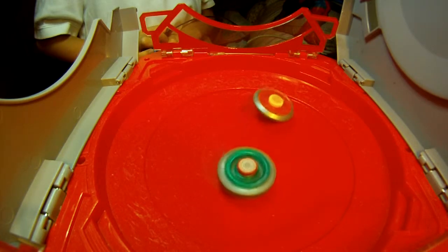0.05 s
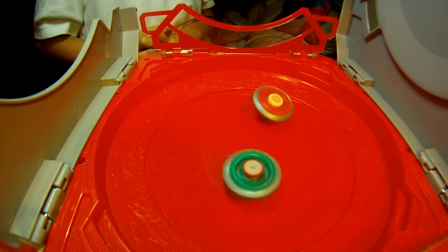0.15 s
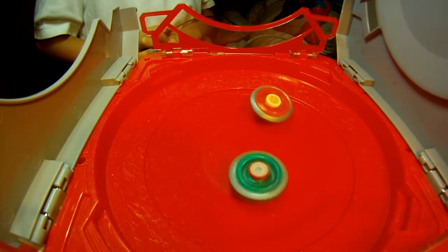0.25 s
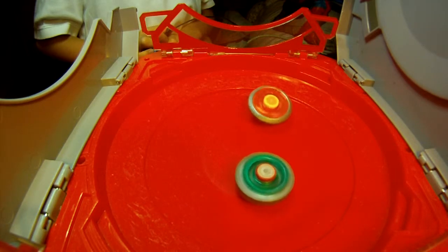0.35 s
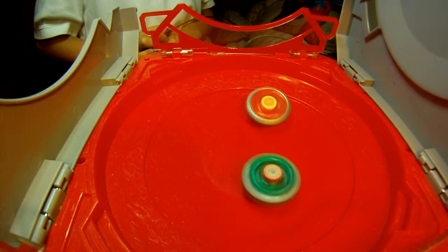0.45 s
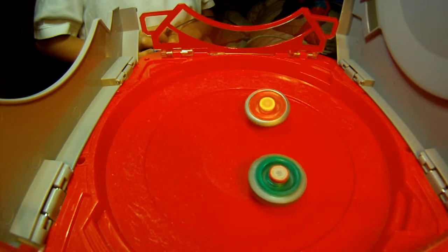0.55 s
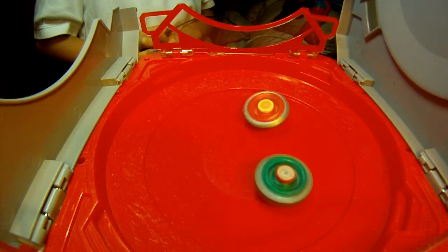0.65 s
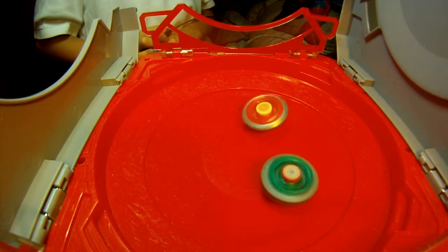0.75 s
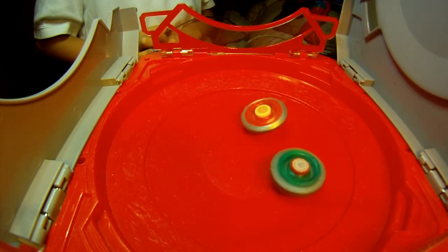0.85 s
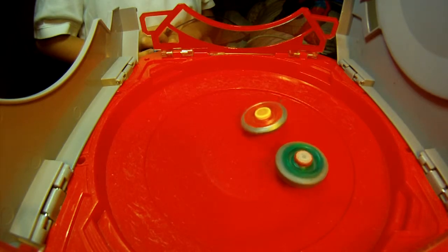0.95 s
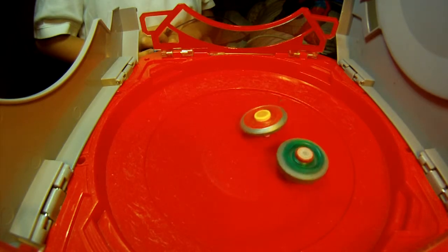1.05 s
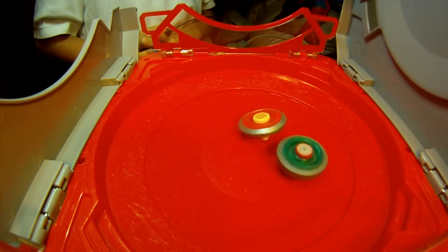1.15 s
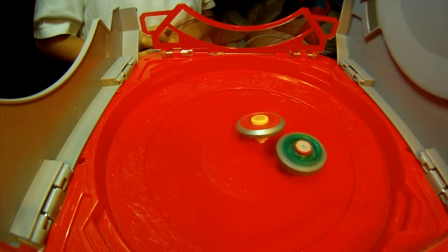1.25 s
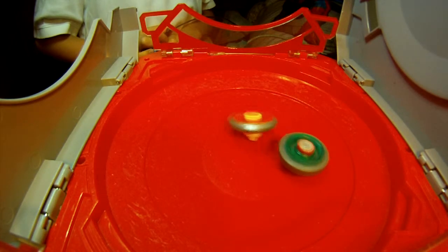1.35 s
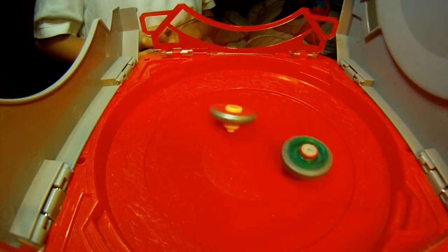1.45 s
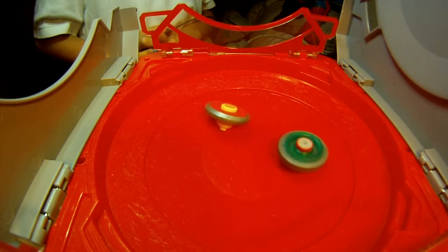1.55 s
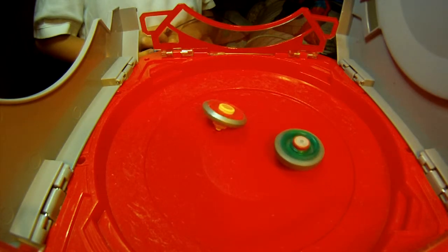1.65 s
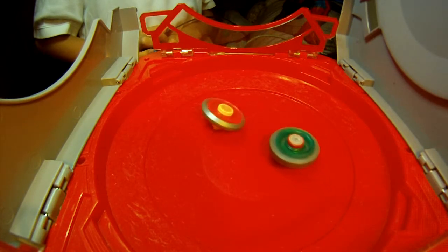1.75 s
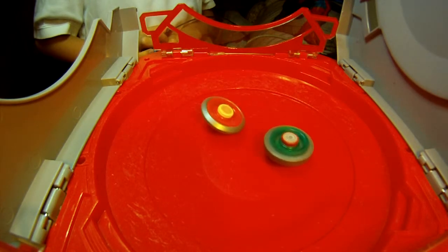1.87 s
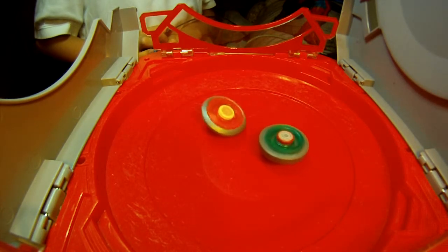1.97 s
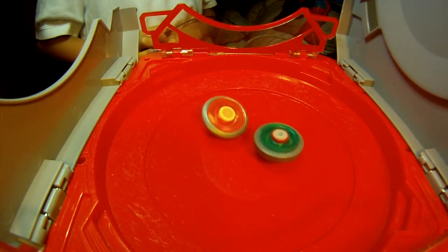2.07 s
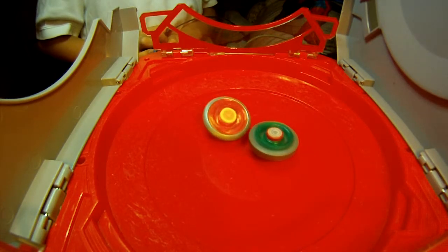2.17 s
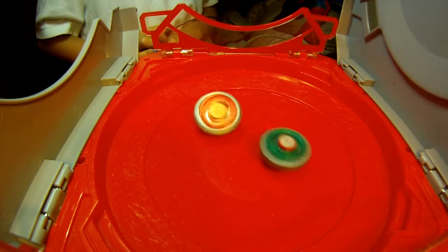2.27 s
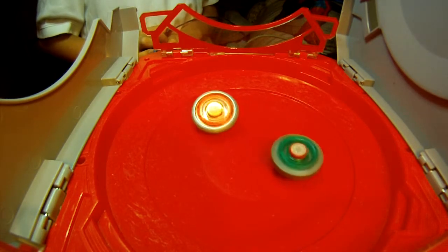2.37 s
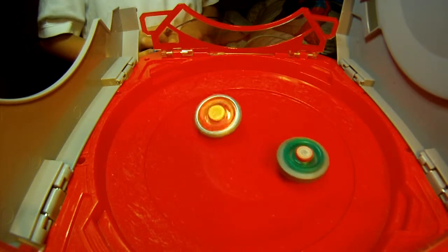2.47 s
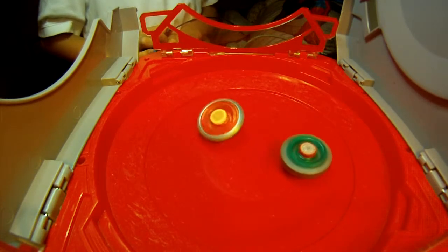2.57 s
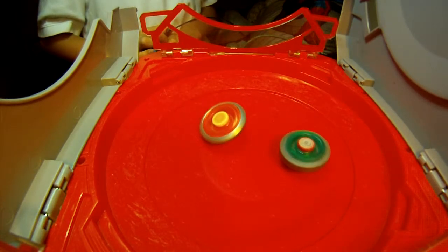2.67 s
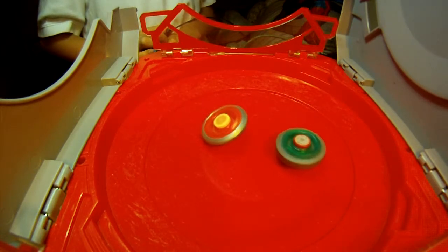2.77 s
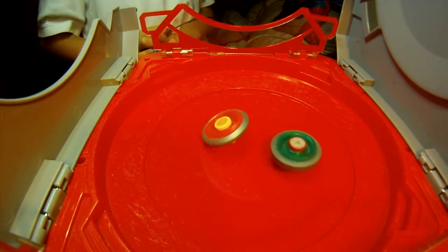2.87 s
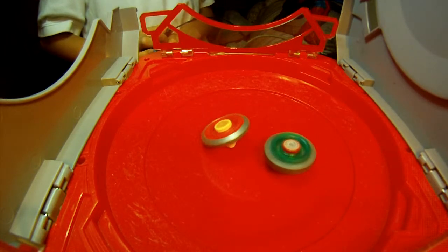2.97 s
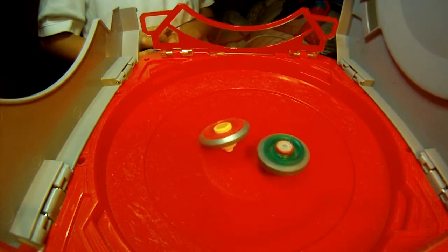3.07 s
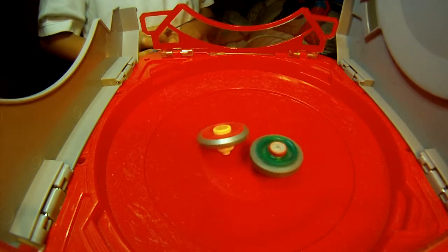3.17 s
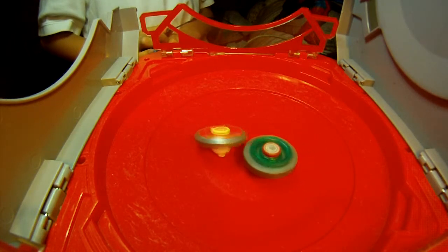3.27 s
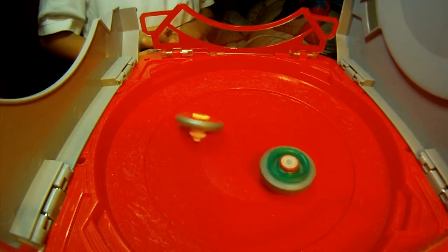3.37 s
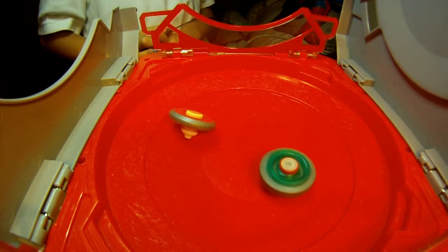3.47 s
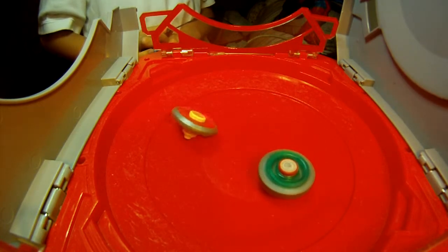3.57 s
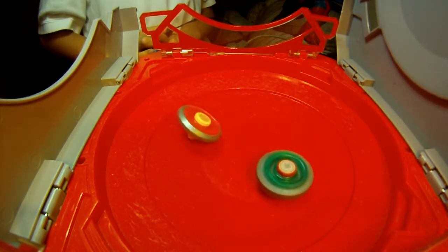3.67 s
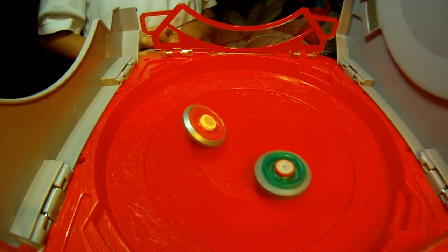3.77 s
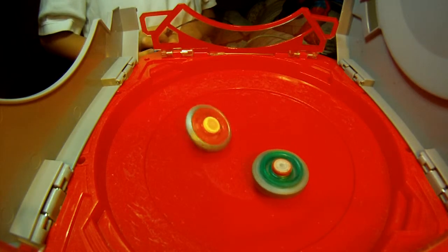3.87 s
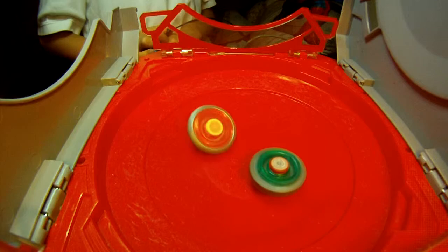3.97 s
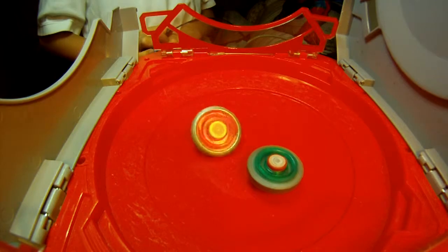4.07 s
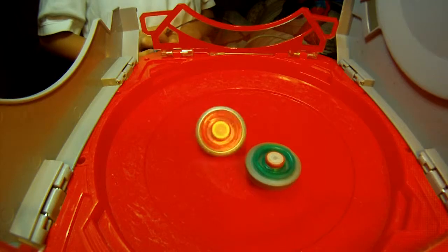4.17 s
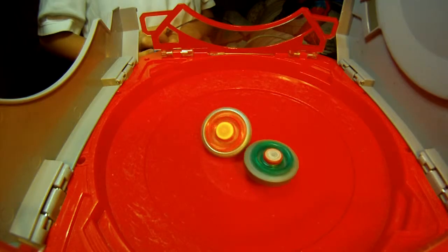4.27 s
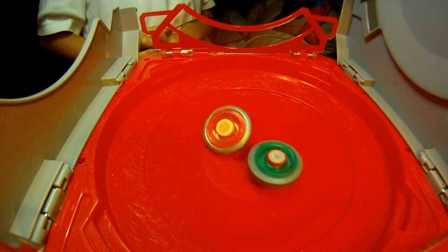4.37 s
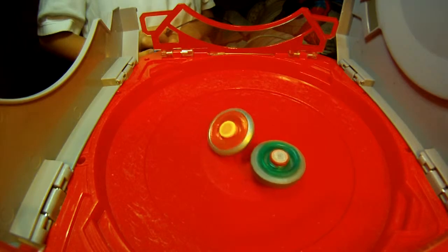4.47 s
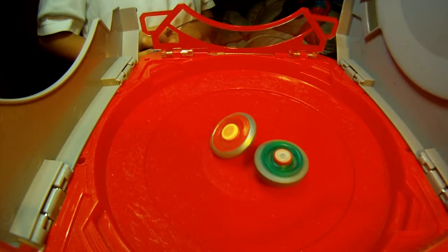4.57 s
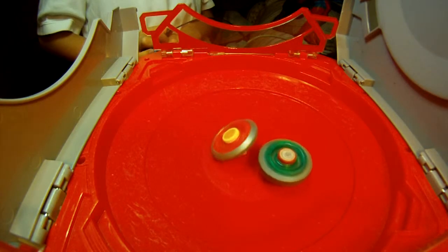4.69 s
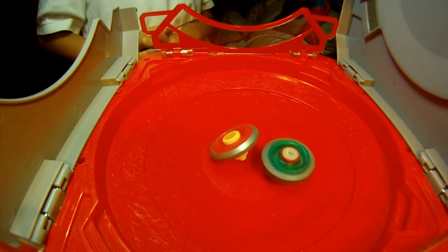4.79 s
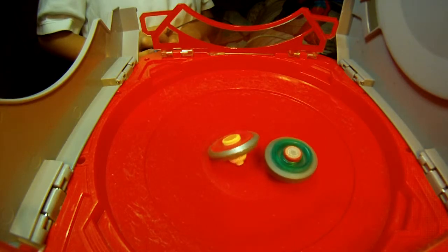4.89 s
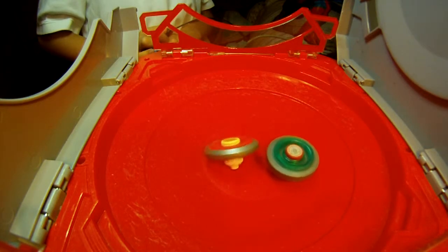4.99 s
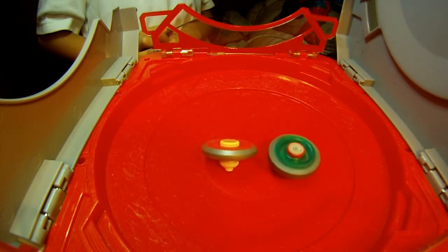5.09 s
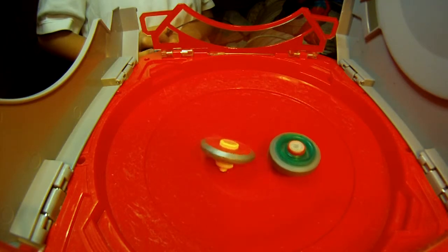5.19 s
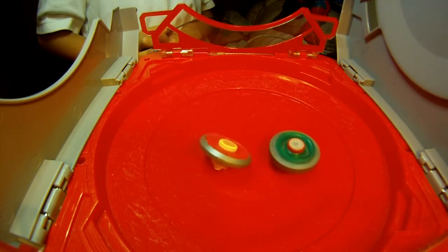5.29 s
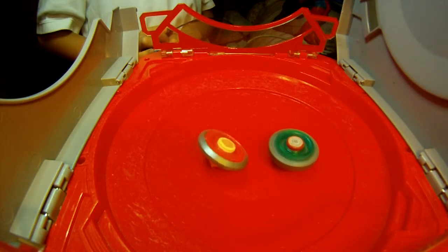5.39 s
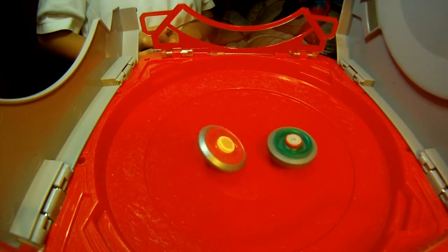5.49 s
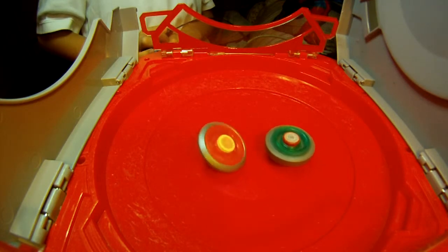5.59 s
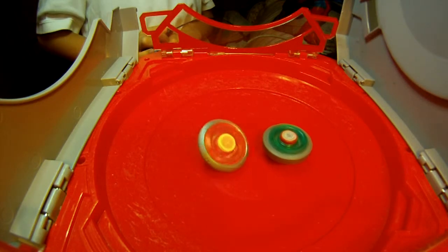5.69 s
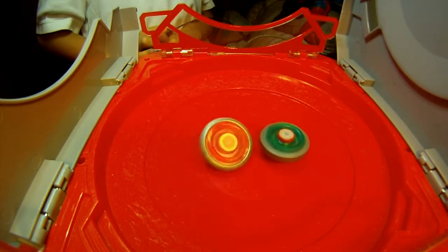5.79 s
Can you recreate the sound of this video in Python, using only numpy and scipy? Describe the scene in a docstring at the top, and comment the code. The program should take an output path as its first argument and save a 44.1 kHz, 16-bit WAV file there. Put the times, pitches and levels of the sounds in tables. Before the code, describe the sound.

In a quiet small room with soft low air noise, two metal-wheeled tops spin on a thin plastic toy floor. A clash at the very start sets off a tenth of a second of hollow, drumming bounces. Then a quiet whir: a low drone slowly fading, rough hiss, a faint early squeak, and a hum swooping up and down about thirty times a second. A tiny tick comes at 0.8. Hard metallic cracks with short bright rings strike at 1.4, 2.3, 3.35 and 4.4 seconds, each followed by rapid uneven plastic knocks and shell rattle; the one at 3.35 is a multiple hit with the longest, heaviest tumble. The hum returns between them, varying in strength. Around 5.0 the leaning top's rapid taps swell into a harder, higher buzz. Duller clacks come near 5.65, then a faint clink at 5.8. Close, coarse sound; loud peaks clip, with glassy treble.

```python
"""In a quiet room, two spinning tops with metal wheels whir on the thin plastic floor of a toy stadium.
The tips' rubbing makes hum, hiss, squeak and drone; the leaning light top taps the floor once a turn.
The wheels clash as short metal tones with a noisy crack; the lighter top is thrown off and bounces,
each landing a drumming floor tone with the bowl's ring and a rattle.
The loudest blows clip, and coarse sampling adds a glassy, mirrored treble."""
import sys
import numpy as np
from scipy import signal
from scipy.fft import rfft, irfft, next_fast_len
from scipy.io import wavfile
from scipy.ndimage import map_coordinates

SR = 44100
rng = np.random.default_rng(int(sys.argv[2]) if len(sys.argv) > 2 else 0)


def unload_audio(sound):
    """Save the sound as a 16-bit wav file, at the path given as the first command line argument."""
    columns = np.transpose(np.atleast_2d(sound))
    # keep every value between -1 and 1, then stretch to whole-number steps
    steps = np.round(np.clip(columns, -1, 1) * 32767)
    wavfile.write(sys.argv[1], SR, steps.astype(np.int16))


N = 257544

# single landings on the floor: (time [s], level [dB], pitch [Hz], shell rattle against the landing [dB])
LANDINGS = [(0.055, -9, 538, -23), (0.065, -8.5, 464, -7), (0.09, -4.5, 448, -15.5),
            (0.104, -6.5, 472, -22), (0.116, -5.5, 485, -20.5), (0.134, -6.5, 430, -20),
            (0.832, -29.5, 476, -27), (1.418, -1, 421, -20.5), (1.449, 0.5, 427, -12),
            (1.462, -4, 458, -14.5), (1.506, -5, 417, -13.5), (1.533, -4, 465, -16.5),
            (2.35, -5, 453, -16.5), (2.361, -3.5, 463, -19), (2.387, -6.5, 444, -13.5),
            (2.844, -29, 523, -18), (3.354, -9, 424, -17), (3.365, -5.5, 487, -13.5),
            (3.392, 6, 471, -27.5), (3.419, -15, 480, -21), (3.459, -8, 503, -12.5), (3.477, -6, 490, -12),
            (3.501, -5, 476, -17), (3.528, -9, 476, -16.5), (3.539, -13, 460, -16), (4.42, -6.5, 568, -9),
            (4.446, 1, 477, -16), (4.47, -12, 470, -13), (4.725, -23, 471, -18.5),
            (5.169, -28.5, 565, -14.5)]
# colour of metal touching metal: (frequency [Hz], level [dB])
METAL_CONTACT = [(500, -2.5), (1300, -13), (2200, -3.5), (3200, -3.5), (4800, -7.5), (5800, -19)]
# the light top is thrown off and skitters:
# (time [s], length [s], hop level [dB], spin lost [turns/s], pitch at which its rub resumes [Hz])
THROWN_OFF = [(.055, 0.11, -14.5, .1, 465), (1.456, 0.12, -17.5, .3, 464.6), (2.316, 0.098, -14, .4, 504),
              (3.352, .195, -12, 1.8, 436), (4.409, 0.081, -12, .1, 579)]
# the rubbing hum, before a small fixed lift: (time [s], low hum level [dB], high hum level [dB])
HUM_LEVELS = np.vstack([ [(0.25, -56, -74), (0.48, -95, -60.5), (0.938, -45, -50), (1.36, -50, -57.5)],
              [(1.66, -37, -45), (1.89, -42, -51), (1.976, -46, -57), (2.27, -53.5, -59)],
              [(2.5, -42.5, -48.5), (2.754, -42.5, -43.5), (3.226, -60.5, -53), (3.3, -54, -52.5)],
              [(3.69, -46.5, -48.5), (3.786, -50.5, -61.5), (4.258, -42, -45), (4.36, -43, -47.5)],
              [(4.58, -47.5, -51.5), (4.946, -59.5, -43), (5.666, -40.5, -51.5), (5.8, -47, -51.5)], ])

# the light, wobbling top: spin at the start (turns/s) and loss to friction (turns/s each second)
START_SPIN, SPIN_FRICTION = 31.9, 0.45
# the same for the upright top
UPRIGHT_SPIN, UPRIGHT_FRICTION = 44, 0.7
# the light top's deepest lean, which falls on one of its taps (s), and its spread to either side (s)
LEAN_S, LEAN_WIDTH_S = 5.026, 0.18
# softness of the fades as the upright top settles (s)
SETTLE_S = 0.1
# build-up of the shell's rattle and of a tap's drag (s)
RATTLE_ATTACK_S = 0.0011


def amp(db):
    """Turn decibels into gain."""
    return 10 ** (np.asarray(db) / 20)


def unit(x):
    """Scale a sound to an average (rms) level of 1."""
    return x / np.sqrt(np.mean(x ** 2) + 1e-20)


def along(points, hz):
    """Read a value off (frequency, value) points, on a log frequency axis."""
    f, v = np.transpose(points)
    return np.interp(np.log(hz + 1), np.log(f + 1), v)


def curves(rows):
    """Draw one curve over time for each column after the time."""
    s, *cols = np.transpose(rows)
    return [np.interp(np.arange(N) / SR, s, c) for c in cols]


def drift(rate):
    """A smooth random curve with rate knots a second."""
    knots = rng.standard_normal(int(N * rate / SR) + 4)
    return map_coordinates(knots, [np.arange(N) * rate / SR])


def filtered(x, response):
    """Multiply the spectrum of x by a response that depends on frequency."""
    m = next_fast_len(len(x) + SR // 4)
    spectrum = rfft(x, m) * response(np.fft.rfftfreq(m, 1 / SR))
    return irfft(spectrum, m)[:len(x)]


def coloured(x, spectrum):
    """Give x a colour from (frequency [Hz], level [dB]) points, at rms 1."""
    return unit(filtered(x, lambda hz: amp(along(spectrum, hz))))


def noise(spectrum, size):
    """Coloured noise of rms 1."""
    return coloured(rng.standard_normal(size), spectrum)


def fade(t, t60):
    """A fall of 60 dB in t60 seconds."""
    return np.exp(-np.log(1000) * t / t60)


def add(track, s, sound):
    """Mix a sound in at s seconds."""
    start = max(round(s * SR), 0)
    track[start:start + len(sound)] += sound[:max(N - start, 0)]


def room_air():
    """The quiet room's air is a soft, mostly low noise."""
    # colour: (frequency [Hz], level [dB])
    air_colour = [(20, -12), (60, -1), (120, 6), (250, 9.5), (700, -9), (2000, -22), (5800, -71)]
    return amp(-53.5) * noise(air_colour, size=N)


def room(x):
    """A small room's echoes blur into a noise tail that dies at a different rate for each pitch."""
    # decay: (frequency [Hz], time to fall 60 dB [s])
    room_decay = [(100, 0.98), (500, 0.29), (3000, 0.42), (6000, 0.38)]
    hz, t, z = signal.stft(rng.standard_normal(SR), SR, nperseg=256)
    tail = signal.istft(z * fade(t, along(room_decay, hz)[:, None]), SR, nperseg=256)[1]
    delayed = np.pad(x, (SR // 200, 0))  # the tail starts 5 ms late
    return signal.fftconvolve(delayed, tail / np.linalg.norm(tail))[:N]


def lean():
    """How far the light top leans toward its rim, 0-1."""
    return np.exp(-((np.arange(N) / SR - LEAN_S) / LEAN_WIDTH_S) ** 2)


def light_turns():
    """Turns of the light top, counted from its deepest lean: friction slows it steadily, throws at once."""
    t = np.arange(N) / SR
    lost_to_throws = sum(lost * (t > s) for s, _, _, lost, _ in THROWN_OFF)
    spin = START_SPIN - SPIN_FRICTION * t - lost_to_throws
    turns = np.cumsum(spin) / SR
    return turns - np.interp(LEAN_S, t, turns)


def upright_turns():
    """Turns of the upright top, which friction slows steadily."""
    return np.cumsum(UPRIGHT_SPIN - UPRIGHT_FRICTION * np.arange(N) / SR) / SR


def track_grain(turns, points=2048):
    """The roughness that a tip meets again at every turn, slowly changing as the top wanders."""
    place = np.stack([turns * 0.12, turns % 1 * points])
    floor = rng.standard_normal((64, int(points)))
    return map_coordinates(floor, place, order=1, mode="grid-wrap")


def drone(steady_turns):
    """The upright top's tip meets the same grain each turn: a low drone that fades steadily."""
    level_db = -47 - 2.53 * np.arange(N) / SR  # falls 2.53 dB a second
    colour = [(50, -15.5), (105, 0.5), (145, -2), (190, 4), (260, -6.5), (800, -53.5), (3000, -75.5)]
    return amp(level_db) * coloured(track_grain(steady_turns), colour)


def squeak(steady_turns):
    """While the upright top circles, its tip rubs out a faint, narrow whine in short strokes."""
    pitch_hz, width_hz, level_db = 3650, 390, -73
    half_faded_s = 1.2
    band = filtered(rng.standard_normal(N), lambda hz: 1 / (1 + ((hz - pitch_hz) / width_hz) ** 2))
    stroke = unit(np.abs(np.sin(np.pi * steady_turns)) ** 6)  # one a turn
    fade_out = 0.5 - 0.5 * np.tanh((np.arange(N) / SR - half_faded_s) / SETTLE_S)
    return amp(level_db) * unit(band) * stroke * fade_out


def scrape(turns, steady_turns):
    """Both tips hiss on the plastic, one short stroke a turn; the upright one grips more while circling."""
    # colour of tips on plastic: (frequency [Hz], level [dB])
    scrape_colour = [(400, -3.5), (800, 13.5), (1400, 5), (2200, 8), (3200, 6), (4800, -0.5), (5800, -14.5)]
    circling_end_s = 0.95
    stroke = lambda phase: np.abs(np.sin(np.pi * phase)) ** 10
    circling = 0.5 - 0.5 * np.tanh((np.arange(N) / SR - circling_end_s) / SETTLE_S)
    upright_share = np.clip(0.085 + 0.25 * circling, 0, 1)
    upright_grip = 1.55 * upright_share * stroke(steady_turns)
    light_grip = 0.31 * (1 - upright_share) * stroke(turns)
    grip = unit((0.5 + upright_grip + light_grip) * amp(0.27 * drift(120)))
    level_db = -64.5 + 5.5 * lean()  # louder in the lean
    return amp(level_db) * grip * noise(scrape_colour, size=N)


def rub_pitch():
    """The top pitch of the rub restarts at each throw and climbs to a limit."""
    climb_hz_per_s, limit_hz = 165.2, 642.4
    t, hz = np.arange(N) / SR, np.full(N, limit_hz)
    for s, _, _, _, resume_hz in THROWN_OFF:
        hz = np.where(t > s, resume_hz + climb_hz_per_s * (t - s), hz)
    return np.minimum(hz, limit_hz)


def hum(turns):
    """The light top's tip rubs the floor into a tone whose pitch rises and falls once a turn."""
    low_db, high_db = curves(HUM_LEVELS)
    angle = 2 * np.pi * (turns + 0.028 * drift(2.8))
    swing = 0.5 + 0.5 * np.cos(angle - 0.5 * np.cos(angle))
    cycles = np.cumsum(215 + (rub_pitch() - 215) * swing) / SR  # swings up from 215 Hz
    # the wave starts afresh at each turn
    turn_start = np.searchsorted(np.floor(turns), np.floor(turns))
    wave = np.sin(2 * np.pi * (cycles - cycles[turn_start]))
    tone = wave * np.abs(np.sin(np.pi * turns)) ** 0.61
    grain_colour = [(60, -33), (200, 15.0), (500, 18.0), (650, -17.5), (900, -29.0)]
    grain = coloured(track_grain(turns), grain_colour)
    rub = unit(tone * amp(1.46 * drift(14))) + amp(0.5) * grain
    low_colour = [(60, 12), (120, -44), (180, -17.0), (232, 3.0), (300, -21.5), (420, -23.0),
                  (800, -2), (3000, -70)]
    high_colour = [(200, -31.0), (350, -11.5), (470, -3.0), (610, 9.5), (705, -68.5),
                   (1200, -25), (4000, -62)]
    low, high = coloured(rub, low_colour), coloured(rub, high_colour)
    return amp(low_db + 0.8) * low + amp(high_db + 0.5) * high


def thud(t, hz, t60, contact):
    """The floor drums under the tip, swelling while it presses in."""
    swell = 1 - np.exp(-(t / contact) ** 2)
    return np.sin(2 * np.pi * hz * t) * fade(t, t60) * swell


def taps(turns):
    """The leaning top nudges the floor once a turn; harder taps are higher and drag more."""
    high_db = curves(HUM_LEVELS)[1]
    # taps grow with the high hum and in the lean
    tap_db = -36 + 1.3 * (high_db - high_db.mean()) + 5.5 * lean()
    soft_tap = 0.3  # hardness outside the lean (0-1)
    hardness = soft_tap + (1 - soft_tap) * lean()
    drag_colour = [(150, 0.5), (550, 2), (1100, -3), (1700, -19.5), (5000, -37.5), (6000, -56)]
    out, t = np.zeros(N), np.arange(SR // 8) / SR
    drag_shape = fade(t, 0.035) * (1 - np.exp(-t / RATTLE_ATTACK_S))
    for i in np.flatnonzero(np.diff(np.floor(turns))):
        pitch_hz = (345 + 215 * hardness[i]) * np.exp(0.04 * rng.normal())
        knock = thud(t, pitch_hz, t60=0.014, contact=0.0018)
        drag = noise(drag_colour, size=len(t)) * drag_shape
        level = amp(tap_db[i] + 0.42 * rng.normal())
        add(out, i / SR, level * (knock + 0.23 * hardness[i] * drag))
    return out


def stadium(x):
    """The plastic bowl resonates at its own pitches, neighbours pushing in opposite directions."""
    # resonances: (frequency [Hz], width [Hz], level [dB])
    bowl_modes = [(77.2, 8.1, -9.5), (117.6, 10.2, 0), (236.7, 38.3, 3), (353, 62, 2), (471, 36, 7),
                  (582, 52, 1), (827, 137, -15.5), (1190, 20, -19)]

    def response(f):
        """Sum the bowl's resonances."""
        return sum((-1) ** k * amp(db) * 1j * f * width / (centre ** 2 - f * f + 1j * f * width)
                   for k, (centre, width, db) in enumerate(bowl_modes))

    return filtered(x, response)


def landing(t, db, pitch_hz, rattle_db):
    """A landing drums on the floor and rattles the shell; the bowl's ring grows more slowly than the blow."""
    # colour of the rattling plastic shell: (frequency [Hz], level [dB])
    rattle_colour = [(300, -45), (830, 9.5), (1030, 2.5), (1230, 3.5), (1400, -4.5), (1590, -2),
                     (1800, -10), (2650, 0), (3050, 1.5), (3800, -15), (5000, -11.5), (5900, -30)]
    drum = thud(t, pitch_hz, t60=0.021, contact=0.0018)
    bowl = stadium(rng.standard_normal(len(t)) * fade(t, 0.045))
    bowl *= amp(-0.6 * max(db + 9.5, 0)) / np.abs(bowl).max()
    rattle_shape = (fade(t, 0.018) + amp(-18.0) * fade(t, 0.17)) * (1 - np.exp(-t / RATTLE_ATTACK_S))
    rattle = noise(rattle_colour, size=len(t)) * rattle_shape
    return amp(db) * (amp(5) * drum + amp(-5.0) * bowl + amp(rattle_db) * rattle)


def skitter(count=16):
    """A thrown top makes quick, uneven little hops, except while it flies toward a single landing."""
    hop_s, hop_scatter = 0.014, 0.2  # time between hops (s), its scatter (share)
    flight_s = 0.02  # time in the air before a landing of 0 dB; weaker landings have less
    out, t = np.zeros(N), np.arange(SR // 3) / SR
    big_s, big_db = np.transpose(LANDINGS)[:2]
    takeoff_s = big_s - hop_s / 2 - flight_s * amp(big_db)
    for start, length, db, _, _ in THROWN_OFF:
        for k, (late, strength, detune) in enumerate(rng.standard_normal((count, 3))):
            s = start + hop_s * abs(k + hop_scatter * late)
            pitch_hz = 467 * np.exp(0.026 * detune)
            hop = landing(t, db + 2.5 * strength, pitch_hz, rattle_db=-16)
            airborne = np.any((s > takeoff_s) & (s < big_s + hop_s / 2))
            if k * hop_s < length and not airborne:
                add(out, s, hop)
    return out


def bounces():
    """The landings that stand out singly, each drumming on the floor."""
    out, t = np.zeros(N), np.arange(SR // 3) / SR
    for s, db, pitch_hz, rattle_db in LANDINGS:
        add(out, s, landing(t, db, pitch_hz, rattle_db))
    return out


def ringing(t, modes):
    """Metal rings in several fading tones, struck at new strengths each time."""
    return sum(amp(db + 0.4 * rng.normal()) * fade(t, t60) * np.sin(2 * np.pi * (hz * t + rng.random()))
               for hz, db, t60 in modes)


def singing(t, spin):
    """A wheel's bending modes: their lobes sweep past as it turns, splitting each tone in two."""
    # long bending modes: (frequency [Hz], level [dB], time to fall 60 dB [s])
    bending_modes = [(3100, -3, 0.25), (4289, 0, 0.7)]
    lobes = np.cos(2 * np.pi * (2 * spin * t + rng.random()))
    waver = 1 + 0.47 * np.sin(2 * np.pi * spin * t)
    return ringing(t, bending_modes) * lobes * waver


def small_parts(t, count):
    """Parts clamped to the wheel add many weak, short tones at random pitches."""
    pitch, life, phase = rng.random((3, count, 1))
    hz = 1200 + 4500 * pitch
    t60 = 0.04 + 0.16 * life
    tones = amp(along(METAL_CONTACT, hz)) * fade(t, t60) * np.sin(2 * np.pi * (hz * t + phase))
    return np.sum(tones, axis=0) / np.sqrt(count)


def clashes():
    """A hard crack and ringing wheels; each contact favours the tones near its own pitch."""
    # a wheel strikes the other wheel or the floor; ring and singing are relative to the clash:
    # (time [s], level [dB], ring [dB], long singing [dB], pitch of the contact [Hz])
    strikes = [(0.0551, -17, 7, -35, 4770), (.833, -47.5, 2, -20, 2830), (1.419, -11, 5.5, -9.5, 3630),
               (1.982, -49.5, -4, -11, 3960), (2.316, -7.5, -0.5, -20.5, 3070),
               (3.3487, -18, 4.5, -15, 3870), (3.363, -12, 4, -20, 3400), (3.391, -15.5, -3, -20, 1600),
               (4.411, -10.5, 0, -24, 3600), (5.642, -22, -27, -34, 2060), (5.689, -28.5, 0, -32, 1980),
               (5.803, -40, 3, -24, 2980)]
    # tones of the metal wheels: (frequency [Hz], level [dB], time to fall 60 dB [s])
    wheel_modes = [(1526, -4.5, .027), (1536, 2.5, .04), (2020, -12, .02), (2250, -18, .05), (2790, -5, .1),
                   (2940, -10.5, .097), (2910, -16, .23), (2975, -19, .21), (3205, -2, .06),
                   (3450, -15.5, .047), (3980, -5, .09), (3835, -24, .3), (4890, -2.5, .06),
                   (5680, -24, .3)]
    out, t = np.zeros(N), np.arange(SR * 2 // 3) / SR
    crack_shape = fade(t, 0.021) + amp(-12) * fade(t, 0.14)
    for s, db, ring_db, sing_db, pitch_hz in strikes:
        # the singing wheel makes 33.5 turns a second
        ring = amp(ring_db) * ringing(t, wheel_modes) + amp(sing_db) * singing(t, spin=33.5)
        crack = noise(METAL_CONTACT, size=len(t)) * crack_shape
        clash = amp(-15.5) * ring + amp(-4) * crack + amp(-13.0) * small_parts(t, count=28)
        # weaker with distance in octaves from the contact's pitch
        favour = lambda hz: amp(-3.2 * np.minimum(np.log2((hz + 1) / pitch_hz) ** 2, 2))
        add(out, s, amp(db) * filtered(clash, favour))
    return out


def scene():
    """Both tops in the stadium, in a quiet room."""
    turns, steady_turns = light_turns(), upright_turns()
    hum_lead = 0.15  # the hum runs this share of a turn ahead of the taps
    whir = drone(steady_turns) + squeak(steady_turns) + scrape(turns, steady_turns)
    whir += hum(turns + hum_lead) + taps(turns)
    blows = skitter() + bounces() + clashes()
    return (room_air() + whir + blows + amp(-15.5) * room(blows))[None]


def record(dry):
    """Loud peaks clip; holding each coarse sample mirrors the sound about half the sampling rate."""
    hold_hz, top_hz = 12000, 15650  # coarse sampling rate, upper limit of the treble
    below = lambda hz, edge: 1 / np.sqrt(1 + (hz / edge) ** 80)  # steep low-pass
    base = filtered(np.clip(dry[0], -1, 1), lambda hz: below(hz, hold_hz / 2))
    # slope, shift to the mirrored pitches, then undo the slope: a held sample's weaker mirror
    slope = filtered(base, lambda hz: 1j * hz)
    steps = slope * 2 * np.cos(2 * np.pi * hold_hz * np.arange(N) / SR)
    mirror = filtered(steps, lambda hz: 1 / (1j * np.maximum(hz, hold_hz / 2)))
    return filtered(base + mirror, lambda hz: below(hz, top_hz) ** 2)[None]


dry = scene()
out = record(dry)
unload_audio(out)
```